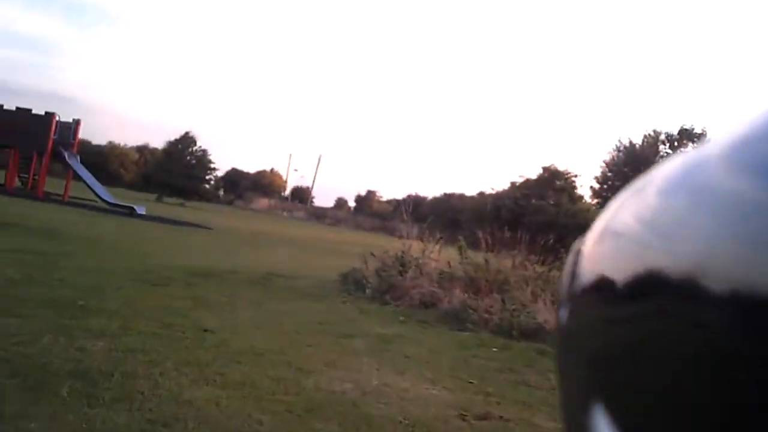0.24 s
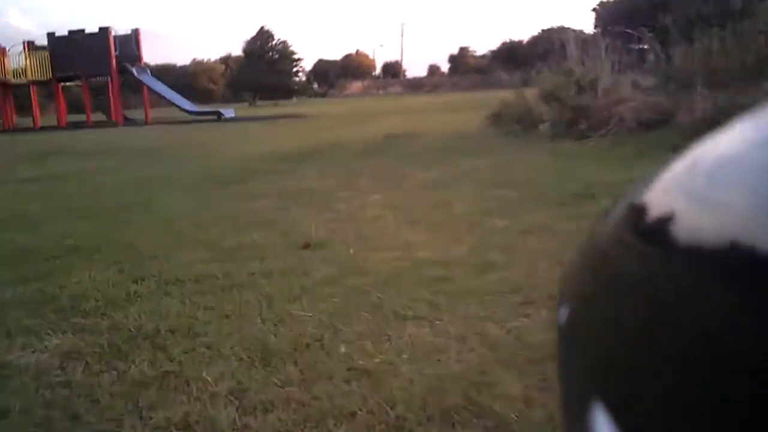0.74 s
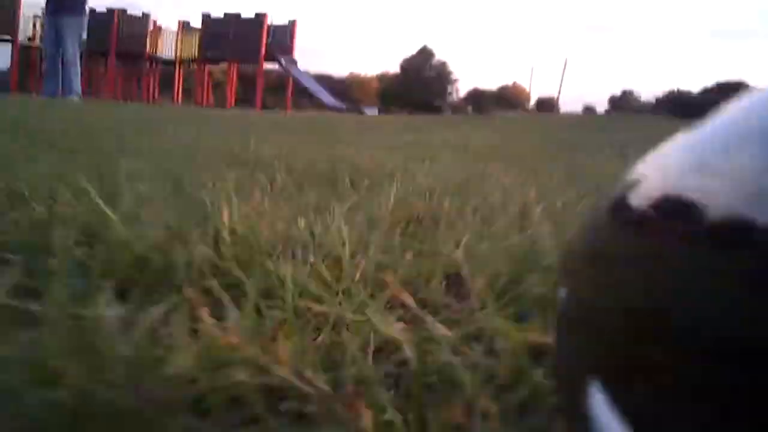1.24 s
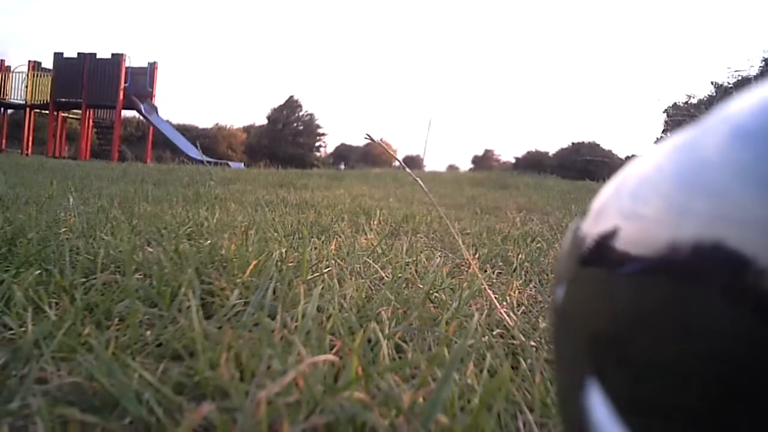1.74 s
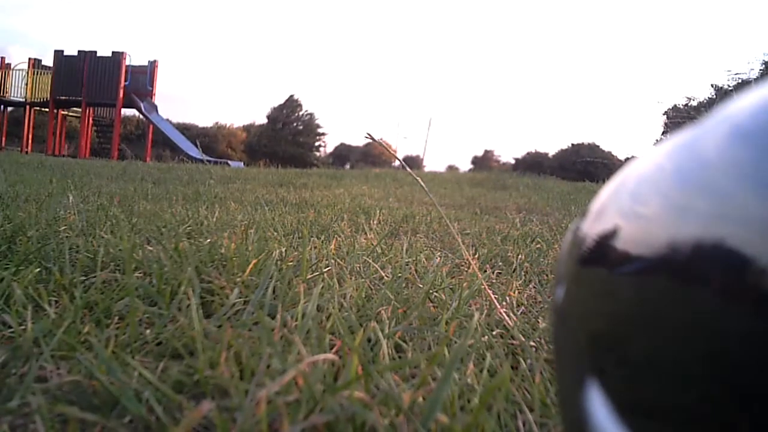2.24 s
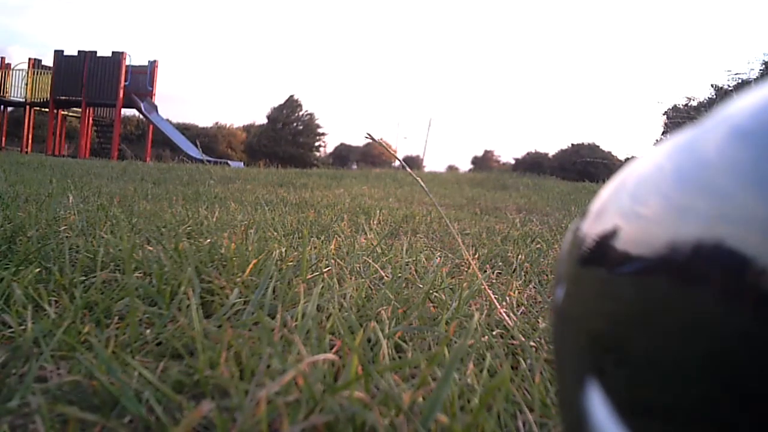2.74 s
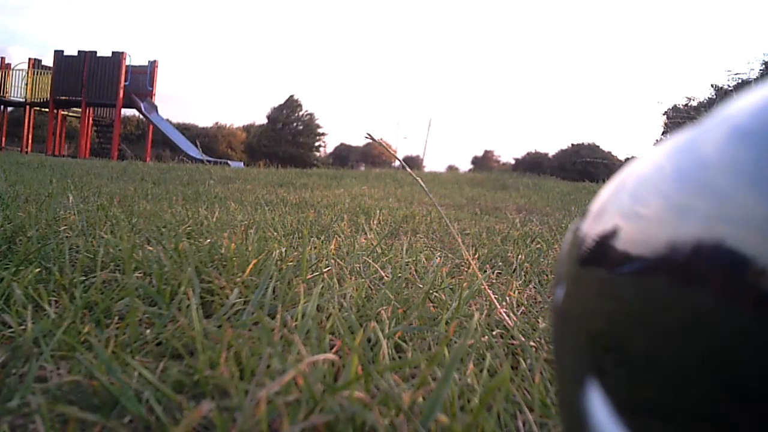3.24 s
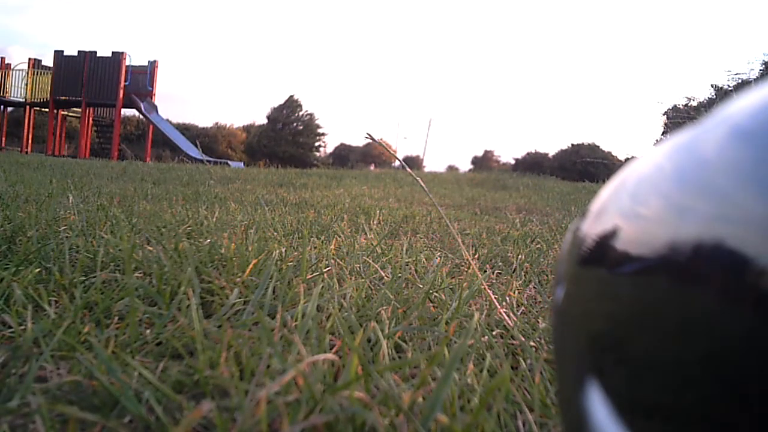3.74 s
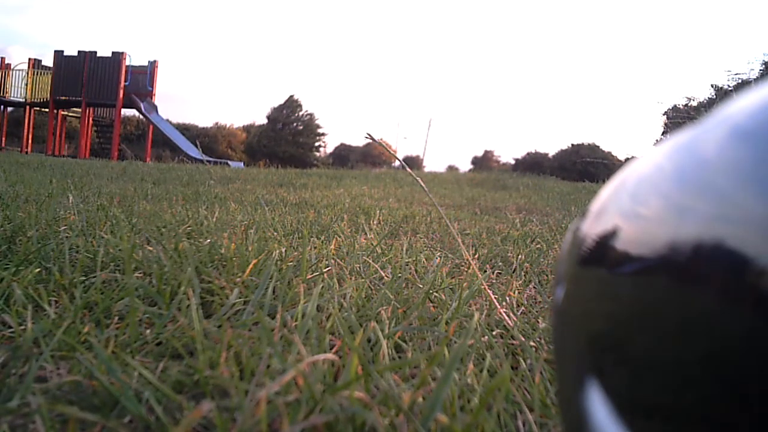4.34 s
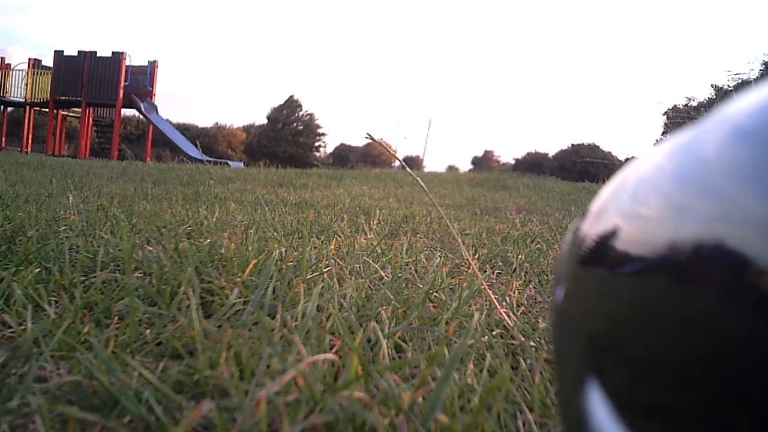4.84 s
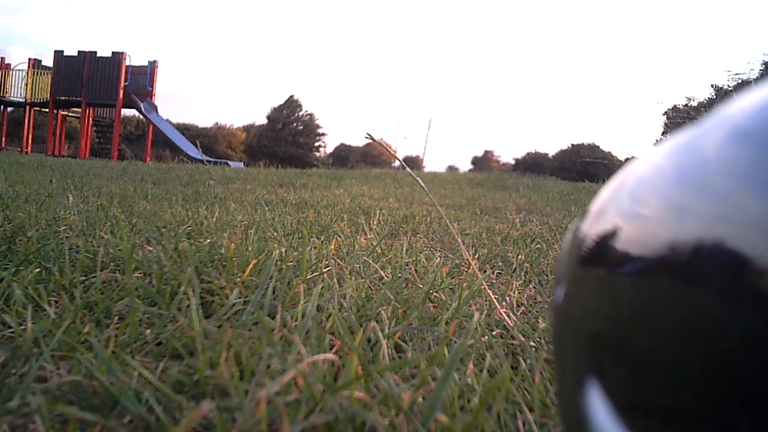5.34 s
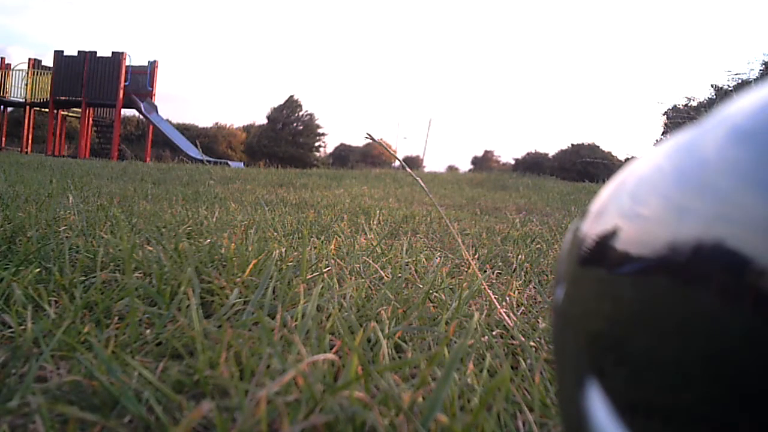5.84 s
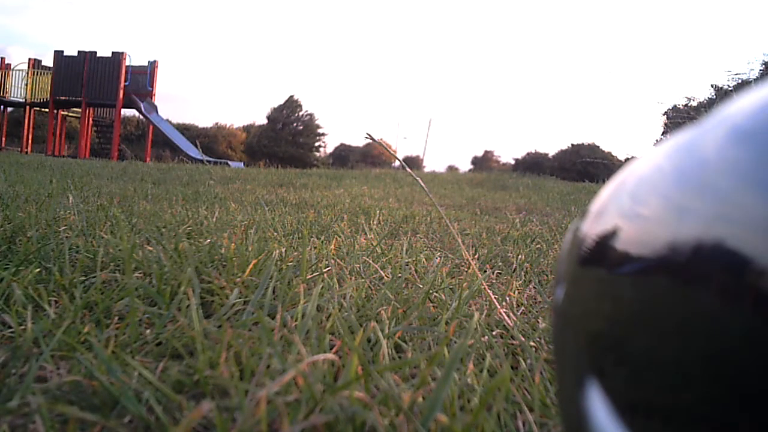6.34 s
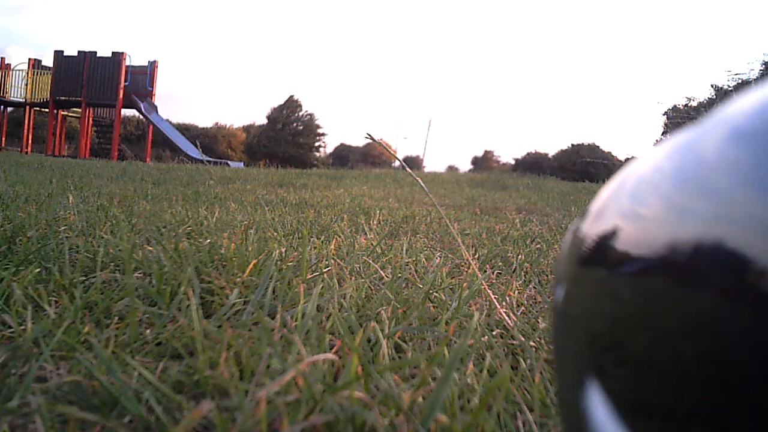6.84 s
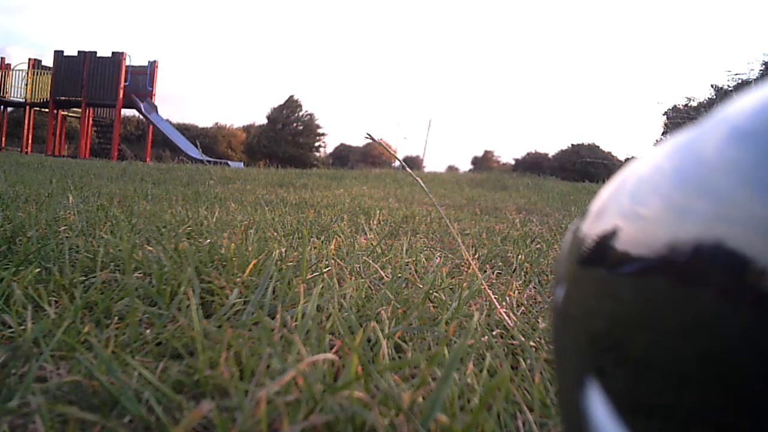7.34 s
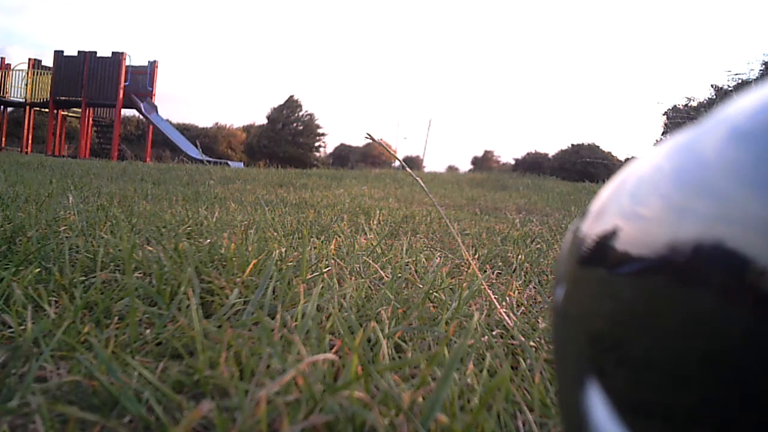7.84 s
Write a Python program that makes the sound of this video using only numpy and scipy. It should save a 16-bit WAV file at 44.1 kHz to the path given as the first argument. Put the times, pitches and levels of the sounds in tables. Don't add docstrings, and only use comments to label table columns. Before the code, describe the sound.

Close, onboard sound outdoors. A throttled propeller buzzes with a harsh loose rattle and high whine, slowing over wind rumble. It slams into grass at one second, parts knocking, bumps again and drags with dry rustle while the unpowered motor's whine slides down to nothing. Then stillness: tiny foam ticks, low far hum, soft traffic and microphone hiss, broken by brief crackly servo jerks, the strongest just before five seconds.

```python
import sys
import numpy as np
from scipy import signal
from scipy.io import wavfile
from scipy.ndimage import uniform_filter1d

SR = 44100
rng = np.random.default_rng(int(sys.argv[2]) if len(sys.argv) > 2 else 0)


def gain_from_db(level_db):
    decades = np.asarray(level_db, float) / 20
    return 10 ** decades


def output_pcm(signal):
    pcm = np.clip(np.atleast_2d(signal).T, -1, 1) * 32767
    wavfile.write(sys.argv[1], SR, np.round(pcm).astype(np.int16))


N = 357651
TIME = np.arange(N) / SR
SPIN = TIME[:int(2.5 * SR)]


def evened(x):
    return x / np.sqrt(np.mean(x ** 2) + 1e-20)


def read(points, hz):
    f, value = np.transpose(points)
    return np.interp(np.log(hz + 1), np.log(f + 1), value)


def columns(rows, t=TIME):
    s, *values = np.transpose(rows)
    return [np.interp(t, s, v) for v in values]


def add(mix, s, sound):
    part = mix[round(s * SR):][:len(sound)]
    part += sound[:len(part)]


def padded(x):
    return np.pad(x, (0, N - len(x)))


def bump(t, centre, width):
    return np.exp(-((t - centre) / width) ** 2)


def colour(x, points, peaks=(), lift_db=0, gaps=()):
    hz = np.abs(np.fft.fftfreq(8192, 1 / SR))
    db = read(points, hz)
    db = db + sum(lift_db / (1 + ((hz - f) / w) ** 2) for f, w, _ in peaks)
    db = db + sum(dip_db / (1 + ((hz - f) / w) ** 2) for f, w, dip_db in gaps)
    log_gain = np.log(gain_from_db(np.maximum(db, -100)))
    taps = np.fft.ifft(np.exp(np.conj(signal.hilbert(log_gain)))).real[:4096]
    return signal.oaconvolve(x, taps / np.linalg.norm(taps))[:len(x)]


def in_band(x, lo_hz, hi_hz):
    band = signal.butter(4, [lo_hz, hi_hz], "band", fs=SR, output="sos")
    return x / np.sqrt(np.mean(signal.sosfilt(band, x) ** 2))


def resonate(x, hz, width):
    r = np.exp(-np.pi * width / SR)
    return 2 * signal.lfilter([1 - r], [1, -r * np.exp(2j * np.pi * hz / SR)], x).real


def decaying(x, seconds):
    return signal.lfilter([1], [1, -np.exp(-1 / seconds / SR)], x)


def drift(seconds, count=N):
    size = max(int(seconds * SR), 1)
    return evened(uniform_filter1d(uniform_filter1d(rng.standard_normal(count), size), size))


# t/s, air load on the blades/dB, once-a-turn rattle level/dB, rattle brightness/dB
FLIGHT = [(0, 4, -48.5, -1.5), (.31, 2, -47, -3), (.37, 1.5, -37.5, 0.5), (.53, 3.5, -35, -4),
          (.63, -0.5, -37, -5), (.8, -2, -38.5, -1), (.82, 2.5, -35, -6), (.9, -0.5, -34, -5),
          (1., 4, -36, -6)]
COGS = 36


def motor():
    t, n = SPIN, len(SPIN)
    load_db, rattle_db, bright_db = columns(FLIGHT, t)
    whine_hz = run_down(t)
    turns = np.cumsum(whine_hz / COGS) / SR + .46
    slowing = np.log2(whine_hz[0] / whine_hz)
    wobble = 0.0047 * drift(0.0157, n)
    powered = np.clip((1.006 - t) / .004, 0, 1)
    turning = np.clip((2.388 - t) / .008, 0, 1)
    push = blades(t, turns + wobble, slowing, load_db, powered) - shake(t, turns, slowing)
    push = push + cogging(t, turns, whine_hz) + magnets(t, turns)
    loose = rattle(t, turns, wobble, powered, rattle_db, bright_db)
    return padded(turning * airframe(push) + rush(t, turns, load_db) + loose + whistle(t, turns))


# t/s, cogging whine f/Hz
SPEED = [(0, 7540), (.32, 7132), (.45, 6858), (.6, 6176), (.72, 5459), (.82, 4730), (.97, 4027),
         (1.15, 3147), (1.33, 2334), (1.7, 1288), (2.45, 45)]


def run_down(t):
    friction_hz = 1236
    log_hz = columns([(s, np.log(hz + friction_hz)) for s, hz in SPEED], t)[0]
    return uniform_filter1d(np.exp(log_hz) - friction_hz, size=1500, mode="nearest")


# shaft order, t/s, extra level/dB, lasting/s
SWELLS = [(2, 0.038, 7, 0.2085), (4, 0.077, 7, 0.098), (4, 0.336, 16.5, 0.048), (4, 0.58, 17, 0.033),
          (5, 0.153, 5, .25), (6, 0.08, 4.5, 0.16), (7, 0.32, 6.5, 0.34), (8, 0.306, 8.5, 0.0303),
          (8, 0.37, 5.5, 0.062), (8, 0.1924, 1.5, 0.056), (3, 0.0963, -2, .15), (6, .38, -1.5, .1),
          (10, 0.47, 4, 0.1017), (9, .5, 6, .1), (5, 0.28, -4.5, 0.085), (8, 0.0616, 3.5, .1),
          (9, 0.0764, -0.5, .12), (10, 0.113, 1.5, 0.16), (12, 0.28, 13, .08), (12, 0.47, 9, .04),
          (11, .62, 6, .1)]


def swell_db(order, t):
    return sum(db * bump(t, s, lasting) for k, s, db, lasting in SWELLS if round(k) == order)


# shaft order, level/dB
PROPELLER = [(1, 14), (2, 4), (3, 10), (4, -2.5), (5, 4), (6, 7), (7, 1.5), (8, 10), (9, -19.5), (10, 10),
             (11, -25), (12, 0.5)]


def blades(t, turns, slowing, load_db, powered):
    tone = np.zeros(len(t))
    for k, db in PROPELLER[1:]:
        level_db = db + swell_db(k, t) + .42 * k * drift(0.017, len(t)) - 2.8 * (k - 1) * slowing
        phase = k * turns + .33 + .08 * rng.standard_normal()
        tone += gain_from_db(level_db) * np.cos(2 * np.pi * phase)
    windmilling = gain_from_db(-12.0 - 7.3 * (t - 2.0))
    return gain_from_db(-29 + 0.83 * load_db) * tone / np.std(tone[:SR // 4]) * np.clip(powered + windmilling, 0, 1)


def shake(t, turns, slowing):
    held_db = -16 * np.exp(-t / 0.082)
    grounded_db = np.clip((t - 1.03) / 0.045, 0, 1)
    level_db = -23.5 + held_db - 9.5 * slowing + grounded_db + 1.32 * drift(0.01, len(t))
    return np.sqrt(2) * gain_from_db(level_db) * np.cos(2 * np.pi * (turns - .1))


# f/Hz, width/Hz, level/dB
COUPLING = [(5500, 2200, -34), (6850, 130, -36), (4040, 260, -30.5), (2030, 116, -16.5), (2434, 53, -35),
            (1650, 120, -34), (1336, 266, -29.5), (1310, 113, -21), (1075, 37, -14.5), (925, 29, -19.5),
            (798, 149, -25), (478, 39, -33.5), (256, 13, -37), (143, 25, -35)]
# t/s, depth 0-1, width/s
NULLS = [(1.266, 0.5, 0.055), (2.3, .7, .01), (1.318, 1, 0.0046), (0.59, 0.5, 0.044), (1.15, 0, .03),
         (1.34, 0.5, .008), (0.039, 0.3, 0.027), (.16, 0.2, .12), (1.4, 0.7, 0.02), (1.706, 0.1, 0.0034),
         (1.742, 0.9, 0.0035), (1.76, 0.8, 0.0033), (1.785, 0.65, 0.003), (1.815, 0.9, 0.023),
         (1.873, 0.99, 0.012), (1.895, 0.68, 0.013), (2.141, 0.87, 0.0079), (2.18, 0.75, 0.016),
         (2.035, 0.6, 0.0068), (2.076, 0.7, 0.0032)]


def cogging(t, turns, whine_hz):
    gain = gain_from_db(-50)
    for hz, width, db in COUPLING:
        gain = gain + gain_from_db(db) * np.exp(-.5 * ((whine_hz - hz) / width) ** 2)
    flutter = (1 + 0.16 * np.cos(2 * np.pi * turns)) * gain_from_db(1.18 * drift(0.0018, len(t)))
    for s, depth, width in NULLS:
        flutter = flutter * (1 - depth * bump(t, s, width))
    return np.sqrt(2) * gain * flutter * np.sin(2 * np.pi * COGS * turns)


# shaft order, loudest t/s, lasting/s
MAGNETS = [(12, 1.55, .1), (12, 1.15, .08), (12, 1.4, .07), (18, 1.57, .08), (18, 1.83, .07),
           (26, 1.55, .04), (26, 1.1, .05), (44, 1.6, .13), (72, 1.862, .03), (75, 1.909, .007),
           (108, 1.75, .03), (18, 1.68, .06), (12, 1.7, .05), (72, 1.96, .04)]
MAGNET_DB = [-42, -44, -46, -38, -44, -28.5, -41, -37, -28, -23.5, -40.5, -46.5, -50.5, -37]


def magnets(t, turns):
    out = np.zeros(len(t))
    for (k, s, lasting), db in zip(MAGNETS, MAGNET_DB):
        level = gain_from_db(db + 3.5 * drift(0.0041, len(t)))
        out += level * bump(t, s, lasting) * np.sin(2 * np.pi * k * turns)
    return out


# f/Hz, width/Hz, level/dB
RINGS = [(499, 100, 3.5), (817, 46, -8), (1240, 18, -6.5), (1554, 58.5, -10.5), (1780, 38.5, -8),
         (2106, 40, -17), (3520, 80, -40.5)]


def airframe(x):
    return gain_from_db(-1.5) * x + sum(gain_from_db(db) * resonate(x, hz, width) for hz, width, db in RINGS)


# t/s, level/dB
STOP_HIT = [(0, -5), (.34, -2), (.4, -3), (.47, 2), (.485, -6), (.495, 9), (.51, -7), (.525, 9), (.64, 3),
            (.652, -8), (.665, 6), (.685, -9), (.7, 2), (.76, -8), (.8, -9), (.815, 6), (.89, 6), (1., 3)]


def rattle(t, turns, wobble, powered, rattle_db, bright_db):
    n = len(t)
    play = drift(0.004, n)
    strikes = np.diff(np.floor(turns + 0.72 * wobble + .013 * play), prepend=0)
    strikes = strikes * gain_from_db(0.5 * play) * powered
    blow = -strikes + 0.31 * np.roll(strikes, 31) - 0.46 * np.roll(strikes, 58)
    loose, scatter_s = .18, .0006
    scatter = decaying(strikes, scatter_s) * rng.standard_normal(n) / np.sqrt(scatter_s * SR / 2)
    blow = np.sqrt(1 - loose) * blow + np.sqrt(loose) * scatter
    bracket = gain_from_db(-7.0) * resonate(blow * gain_from_db(rattle_db + 36.0), 3530, 39) * np.sqrt(400 / 45)
    bright = gain_from_db(bright_db + 5.1 * drift(0.0037, n) * (t < .33))
    top = gain_from_db(columns(STOP_HIT, t)[0] + 2.1 * drift(.01, n))
    suction = decaying(strikes * gain_from_db(rattle_db + 10), .0026)
    return bracket + mount(blow * gain_from_db(rattle_db + 40.0), bright, top) - suction


# f/Hz, width/Hz, level/dB
MOUNT = [(1200, 2100, -1), (1960, 270, 5.5), (2640, 780, 1.5), (3556, 190, 4.5), (4160, 190, -3),
         (4970, 1060, 1.5), (6180, 660, 1.5), (7400, 710, 1.5), (8190, 370, 0.5), (9650, 570, -4.5),
         (11700, 620, -10), (13000, 520, -15), (14200, 760, -12)]
# f/Hz, width/Hz, depth 0-1
VALLEYS = [(5950, 320, 0.9), (6720, 330, 0.54)]


def mount(x, bright, top):
    out = 0
    for k, (hz, width, db) in enumerate(MOUNT):
        hardness = top if hz > 12300 else bright if hz > 9000 else 1
        out = out + (-1) ** k * gain_from_db(db) * resonate(x * hardness, hz, width) * np.sqrt(400 / width)
    for hz, width, depth in VALLEYS:
        out = out - depth * resonate(out, hz, width)
    return out


# f/Hz, level/dB
RUSH = [(150, -10), (250, -10), (348, -13), (400, -6.5), (538, -10), (607, -2.5), (698, -6), (1530, -2),
        (1670, 2.5), (2710, -8), (3580, -3), (6590, -15), (7980, -22), (8700, -22), (16000, -57)]


def rush(t, turns, load_db):
    gate = (1 + 0.032 * np.cos(2 * np.pi * turns)) * gain_from_db(0.6 * drift(0.0024, len(t)))
    noise = in_band(colour(rng.standard_normal(len(t)) * gate, RUSH), 2330, 3150)
    noise = noise * gain_from_db(-27.5 + load_db - 12.0) * np.clip((1.04 - t) / 0.0079, 0, 1)
    return noise - .65 * np.clip((t - .4) / .35, 0, 1) * resonate(noise, 5600, 3200)


def whistle(t, turns):
    tone = (1 + .5 * np.cos(2 * np.pi * turns)) * np.sin(2 * np.pi * 8016 * t)
    return 1.65 * gain_from_db(-38.5) * tone * np.clip((.52 - t) / 0.058, 0, 1)


# t/s, level/dB, push/s, rebound/s, rebound share
THUMPS = [
    (1.003, 0.5, 0.016, 0.034, 0.31),
    (1.224, -16, 0.036, 0.031, 1),
    (1.236, -10.5, 0.011, 0.053, 0.14),
    (1.292, -17.5, 0.0062, 0.032, 0.91),
    (1.424, -22, 0.034, 0.032, 0.4),
]


def landing():
    spectrum = [(8, 1.0), (30, 8), (60, -8.0), (120, -14.0), (300, -54.5)]  # f/Hz, level/dB
    rumble = colour(rng.standard_normal(N), spectrum)
    sliding = np.maximum(TIME - 1.03, 0)
    wind_db = np.where(sliding > 0, -24 - 30 * sliding ** 1.67, -23 - 8.5 * TIME)
    out = in_band(rumble, 9.9, 90) * gain_from_db(wind_db) * np.clip((2.4 - TIME) / .1, 0, 1)
    for s, db, push, rebound, share in THUMPS:
        add(out, s, gain_from_db(db) * np.sin(np.pi * np.arange(0, push, 1 / SR) / push))
        u = np.arange(0, 3, 1 / SR / rebound)
        add(out, s + push, -gain_from_db(db) * share * 4 * u * np.e * np.exp(-4 * u))
    return out


# t/s, peak level/dB, length/s, brightness/dB
KNOCKS = [(1.0086, 1.5, 0.0052, -12), (1.0113, 1.5, 0.0046, -10), (1.0125, -9, 0.0033, -6),
          (1.02, -24.5, .002, 4), (1.0236, -8, 0.0027, 10), (1.0274, -6, 0.0022, 0),
          (1.049, -21, 0.0066, -8), (1.062, -14, 0.0037, 10), (1.0687, -17, 0.0033, 5),
          (1.075, -19.5, 0.0082, 2), (1.108, -19, 0.0036, 2), (1.1094, -17, 0.0051, -2),
          (1.1213, -16, 0.0043, 7), (1.125, -23, 0.0018, 4), (1.1326, -13.5, 0.003, -4.5),
          (1.14, -23, 0.0033, -7), (1.15, -20.5, 0.0085, -8), (1.163, -20, 0.0048, -6),
          (1.177, -14.5, 0.0026, -11), (1.2075, -23, .002, -4), (1.2577, -15, 0.0017, -12),
          (1.2934, -10, 0.005, -3), (1.2957, -8, .003, 4)]


def knocks():
    drive = np.zeros(len(SPIN))
    t = np.arange(1500) / SR
    for s, db, length, _ in KNOCKS:
        burst = rng.standard_normal(1500) * np.minimum(t / 0.00073, 1) * np.exp(-3 * t / length)
        add(drive, s, gain_from_db(db + 6.5) * burst)
    starts, _, _, bright_db = np.transpose(KNOCKS)
    latest = np.maximum(np.searchsorted(starts, SPIN) - 1, 0)
    bright = gain_from_db(bright_db[latest] - 5.5)
    return padded(mount(drive, bright, bright))


# f/Hz, width/Hz, level/dB (unused: all modes are lifted alike)
SHELL = [(738, 66, -8), (1212, 47, -6), (2027, 217, 0), (2340, 160, 0), (3473, 68, -9), (4180, 300, -7),
         (5770, 154, -14), (7870, 217, -11), (10280, 78, -21)]


def shell(x, spectrum, lift_db, modes=SHELL, gaps=()):
    return colour(x, spectrum, modes, lift_db, gaps)


# f/Hz, level/dB
DRAG = [(88, -33.5), (150, -4.5), (321, -8), (514, 0), (637, -7.5), (1190, -1.5), (1790, -3.5), (2600, -16),
        (4300, -22), (5100, -22.5), (14500, -57), (16000, -43.5)]
# t/s, extra level/dB, lasting/s
TUFTS = [(1.4, 2.5, .03), (1.53, 5, 0.037), (1.57, 3, 0.027), (1.81, 1, 0.059), (1.87, 3.5, .015),
         (2.071, 12.5, 0.0044), (2.094, 12.5, 0.0055), (2.13, 3, 0.0055), (2.165, 4, .018),
         (2.197, 4, .004), (2.21, 5, .004), (2.15, 3, .004), (2.111, 4, .004), (2.297, 18, 0.0056),
         (2.315, 15, 0.0092), (2.337, 12, .006)]


def grass():
    t, n = SPIN, len(SPIN)
    snaps = rng.standard_normal(n) * gain_from_db(2 * np.minimum(rng.exponential(1, n), 1.5))
    snaps = snaps * (rng.random(n) < 1500 / SR)
    grains = rng.standard_normal(n) + .6 * evened(uniform_filter1d(snaps, 5))
    grains = grains * gain_from_db(3.5 * drift(.005, n))
    touching = np.clip((t - 1.02) / 0.0059, 0, 1) * np.clip((2.43 - t) / 0.026, 0, 1)
    rustle = in_band(shell(grains, DRAG, 5.5), 1866, 2570)
    rustle += 17.0 * resonate(grains, 730, 170.0) * np.clip((t - 2.05) / 0.28, 0, 1)
    stop_s = 2.016
    drag_db = -35 - 3 * np.clip((t - stop_s) / 0.016, 0, 1) - 89 * np.maximum(t - stop_s, 0)
    drag_db += sum(db * bump(t, s, lasting) for s, db, lasting in TUFTS)
    return padded(rustle * gain_from_db(drag_db - 6.5) * touching)


def stroke(start, push, first_db, last_db, release):
    t = np.arange(0, push + 50 / release, 1 / SR)
    return t, np.interp(t, [0, push], [first_db, last_db]) - release * np.maximum(t - push, 0)


# f/Hz, level/dB
SERVO = [(88, -75), (150, -14.5), (774, -17.5), (1060, -14.5), (2060, -14), (2760, -15), (4080, -16),
         (4950, -22), (7770, -19.5), (14500, -32), (15900, -40)]
# t/s, push/s, first effort level/dB, last effort level/dB, load on the foam/dB
TWITCHES = [(4.81, 0.014, -44, -34.5, -5), (4.826, 0.019, -44, -17, -7.5), (4.857, 0.0043, -41, -47, -6),
            (5.665, 0.016, -41, -30.5, 7.5), (5.691, 0.011, -52, -33, 1), (7.175, 0.013, -43, -34.5, 6.5),
            (7.193, 0.017, -34.5, -38, 8), (7.21, 0.015, -34, -22.5, -5), (7.231, 0.0086, -49, -40, 0),
            (7.45, 0.0061, -40, -35, -1), (7.46, 0.0059, -45, -24.5, -1), (7.572, 0.0065, -55, -34, 3),
            (7.7451, 0.0022, -29, -42, 1)]
# t/s, push/s, first effort level/dB, last effort
# level/dB
SLIDE = [(1.204, 0.01, -40, -47), (1.213, .008, -44, -44), (1.225, 0.017, -40, -37),
         (1.24, 0.016, -45, -45), (1.258, 0.023, -38.5, -40), (1.3, 0.0074, -42, -38),
         (1.314, 0.012, -54, -39), (1.34, 0.027, -45.5, -52), (1.392, 0.012, -48, -39.5),
         (1.416, 0.024, -44, -43.5), (1.445, 0.014, -53, -46), (1.462, .012, -45.5, -46),
         (1.497, .008, -52, -51), (1.518, 0.02, -47, -49), (1.552, 0.019, -52, -38),
         (1.59, 0.017, -44.5, -42.5), (1.651, 0.0099, -50, -41.5), (1.725, .012, -58, -51),
         (1.755, 0.035, -54, -53), (1.796, 0.045, -50, -55), (1.852, .006, -52, -58),
         (1.875, 0.013, -60, -54), (1.903, 0.0069, -48, -57), (1.927, .012, -53, -56),
         (1.97, 0.017, -56, -50), (1.992, 0.02, -47, -37), (2.028, .03, -40.5, -40.5),
         (2.652, 0.0024, -43, -50)]
# f/Hz, width/Hz, level/dB
PANEL = [(198, 22, 0), (684, 160, -27), (1240, 29, -5), (1430, 350, 2)]
# f/Hz, width/Hz, level/dB
GAPS = [(1080, 120, -5), (1700, 120, 1), (2670, 310, -2.5), (3440, 90, -3), (5100, 220, -3),
        (6300, 300, -4)]


def servos():
    effort, load, scrape = np.zeros(N), np.zeros(N), np.zeros(N)
    for *row, load_db in TWITCHES:
        t, effort_db = stroke(*row, release=2004)
        jerk = 1 + 1.5 * np.exp(-t / 0.0044)
        add(effort, row[0], gain_from_db(effort_db - 1.0) * jerk)
        add(load, row[0], gain_from_db(effort_db + load_db + 4.0))
    for row in SLIDE:
        add(scrape, row[0], gain_from_db(stroke(*row, release=1490)[1] + 6.5))
    teeth = rng.standard_normal(N) * gain_from_db(1.2 * np.minimum(rng.exponential(1, N), 2))
    teeth = teeth * (rng.random(N) < 4000 / SR)
    teeth = evened(evened(teeth) + 0.49 * rng.standard_normal(N))
    panel = np.zeros(N)
    for hz, width, db in PANEL:
        panel += gain_from_db(db) * resonate(teeth * load, hz, width) * np.sqrt(400 / width)
    twitch = shell(teeth * uniform_filter1d(effort, size=80), SERVO, 11, gaps=GAPS)
    catching = gain_from_db(3 * drift(.003))
    crackle = shell(teeth * catching * uniform_filter1d(scrape, size=80), SERVO, 7.5, SHELL[:8])
    return twitch + panel + crackle


# f/Hz, level/dB
SETTLE = [(300, -46), (700, 9), (1300, 4), (2300, -12), (2800, 3), (3800, -3), (4700, -22), (8000, -14),
          (16000, -12)]
# t/s, peak level/dB, main f/Hz, length/s
TICKS = [(1.905, -26, 1757, 0.0073), (1.186, -30, 2100, .006), (1.201, -24, 2100, 0.0056),
         (1.207, -26, 2050, .006), (1.221, -27, 2050, .007), (1.246, -22, 1900, .005),
         (1.27, -28, 1900, .004), (2.033, -33, 2370, .01), (2.098, -39, 1800, 0.0057),
         (2.115, -34, 1850, 0.0089), (2.149, -36, 1310, 0.011), (2.165, -44, 1200, 0.011),
         (2.204, -44, 1690, 0.0089), (2.218, -37, 3650, .006), (2.22, -44, 2150, 0.0073),
         (2.236, -32, 3600, 0.0076), (2.263, -42, 1270, .006), (2.295, -42, 1012, 0.0038),
         (2.309, -45, 1213, 0.0038), (2.342, -40, 1280, 0.0081), (2.37, -37, 3000, 0.0091),
         (2.4, -38, 3650, 0.005), (2.432, -36, 1240, 0.013), (2.478, -40, 1860, 0.012),
         (2.476, -38.5, 3460, .014), (2.529, -44, 1280, 0.032), (2.618, -33, 3500, 0.0043),
         (2.573, -40, 3700, .006), (2.66, -44, 1700, 0.005), (2.672, -43, 3600, .007),
         (2.716, -39.5, 1780, 0.0091), (2.73, -40, 1830, 0.008), (2.755, -33.5, 1240, 0.014),
         (2.758, -41, 3100, 0.013), (2.828, -39.5, 1760, 0.014), (2.935, -34.5, 1200, 0.0079),
         (3.038, -34.5, 1350, 0.0087), (3.134, -34, 1200, 0.011), (3.155, -35.5, 2170, 0.0092),
         (3.21, -40.5, 1670, 0.0099), (3.35, -37.5, 2260, 0.023), (3.51, -38, 1490, 0.0093),
         (3.556, -38.5, 1800, 0.0051), (3.673, -38, 1230, 0.021), (3.856, -35.5, 3400, 0.013)]


def ticks():
    puffs, local = np.zeros(N), np.zeros(N)
    t = np.arange(2000) / SR
    for s, db, hz, length in TICKS:
        burst = rng.standard_normal(2000) * gain_from_db(rng.standard_normal(2000))
        swell = np.sin(np.pi * np.minimum(.9 * t / length, 1) ** .75) ** 2
        puff = gain_from_db(db - 9.0) * burst * swell
        add(puffs, s, puff)
        add(local, s, 2.2 * resonate(puff, hz, 400))
    return .42 * shell(puffs, SETTLE, 10) + local


# t/s, drone level/dB, traffic level/dB
FAR = [(1.4, -53.5, -44.5), (2.2, -45.5, -53), (3.06, -46, -56), (3.47, -43, -55), (4.34, -47, -57),
       (4.61, -45.5, -56), (4.95, -47, -52), (5.1, -46.5, -54.5), (5.54, -50.5, -51.5),
       (5.95, -45.5, -57.5), (6.22, -42.5, -56), (6.85, -44.5, -50), (7.27, -45.5, -57.5),
       (8.11, -44, -56.5)]
# f/Hz, level/dB
TRAFFIC = [(150, 1.5), (250, -0.5), (400, 0), (600, -7), (900, -27), (1500, -49)]
# f/Hz, level/dB
HISS = [(8.8, -33), (15, 0), (84, -9.5), (119, -6.5), (142, -19), (164, -7), (190, -13.5), (361, -15.5),
        (455, -32), (865, -29.5), (3310, -36.5), (14200, -39.5), (16000, -45)]


def surroundings():
    drone_db, traffic_db = columns(FAR)
    hz = 143.7 - 1.15 * TIME
    turns = np.cumsum(hz + 1.45 * drift(0.068)) / SR
    drone = np.sqrt(2) * gain_from_db(drone_db + 1.86 * drift(0.023)) * np.sin(2 * np.pi * turns)
    drone += gain_from_db(drone_db - 11 + 2.5 * drift(.1)) * np.sin(4 * np.pi * turns)
    traffic = in_band(colour(rng.standard_normal(N), TRAFFIC), 300, 700)
    traffic = traffic * gain_from_db(traffic_db - 1.5 + 1.5 * drift(.1))
    hiss = in_band(colour(rng.standard_normal(N), HISS), 1750, 16000) * gain_from_db(-60.5)
    return drone + traffic + hiss


def scene():
    return (motor() + landing() + knocks() + grass() + servos() + ticks() + surroundings())[None]


def top_cut(x):
    return signal.sosfilt(signal.butter(12, 16260, fs=SR, output="sos"), x)


def record(dry):
    ceiling, knee = .7, 7
    saturated = dry / (1 + abs(dry / ceiling) ** knee) ** (1 / knee)
    edge = signal.firwin(255, 15850, window=("kaiser", 9), fs=SR)
    limited = signal.oaconvolve(saturated, edge[None], "same")
    return top_cut(limited)


dry = scene()
out = record(dry)
output_pcm(out)
```